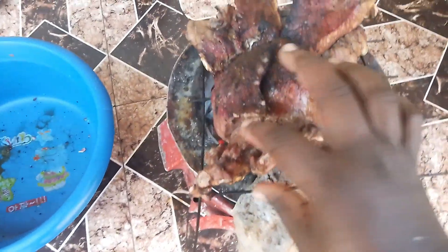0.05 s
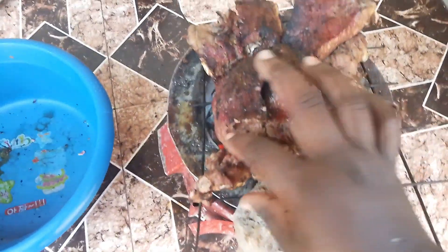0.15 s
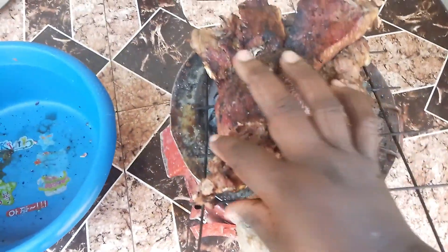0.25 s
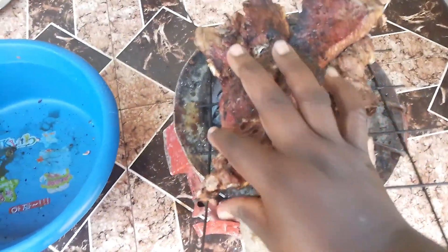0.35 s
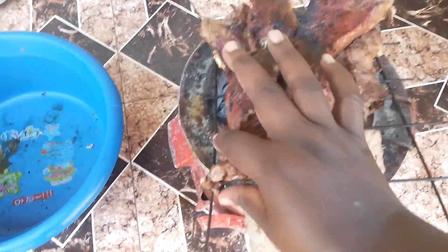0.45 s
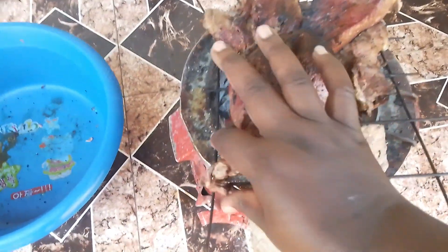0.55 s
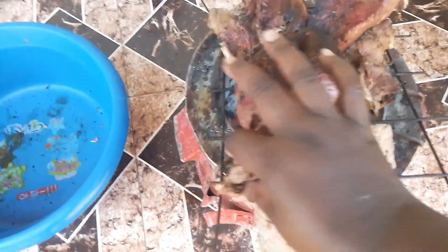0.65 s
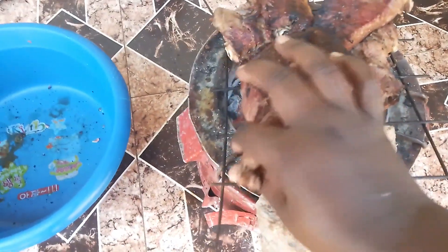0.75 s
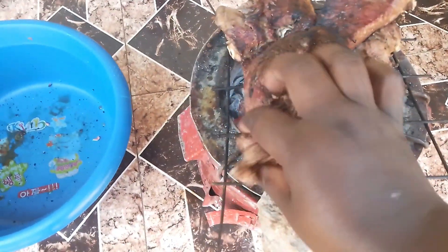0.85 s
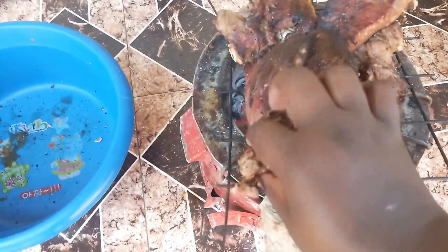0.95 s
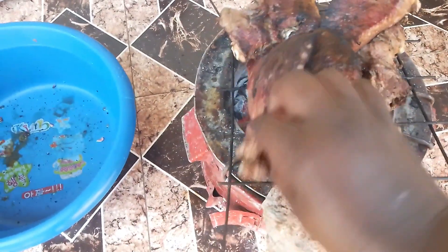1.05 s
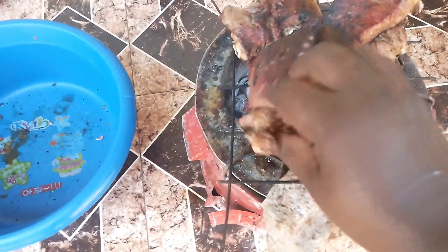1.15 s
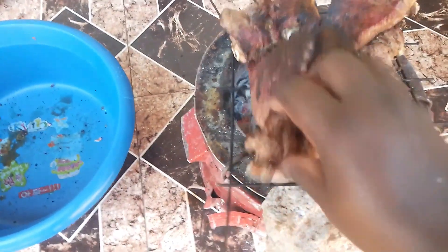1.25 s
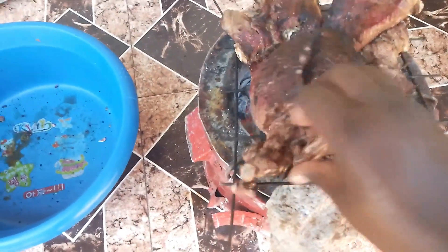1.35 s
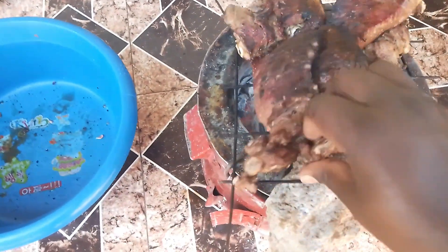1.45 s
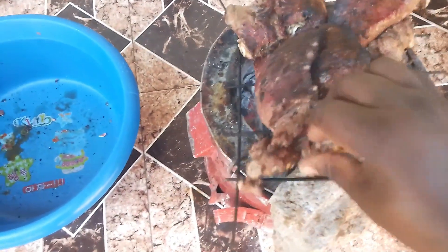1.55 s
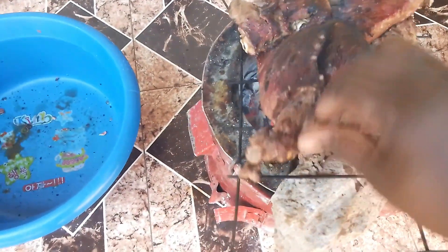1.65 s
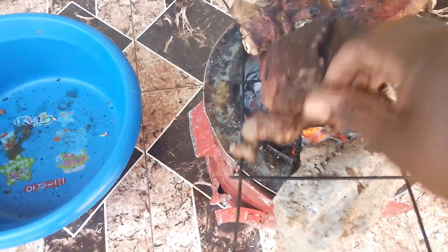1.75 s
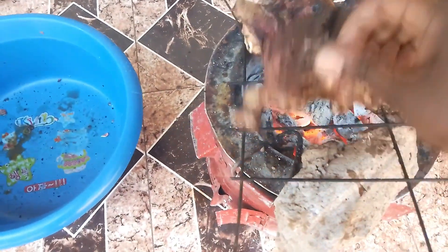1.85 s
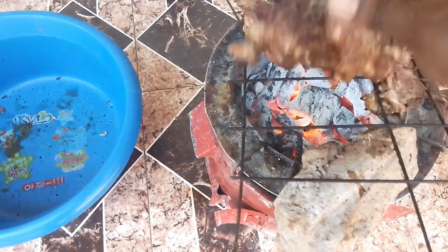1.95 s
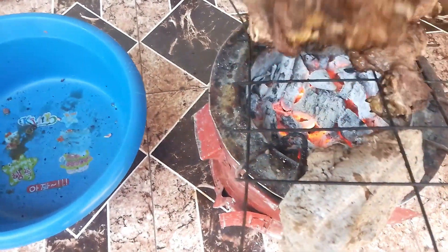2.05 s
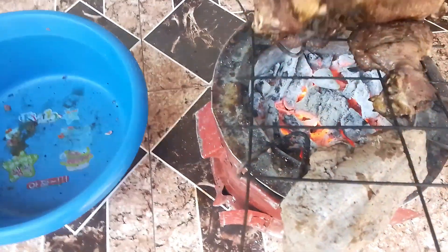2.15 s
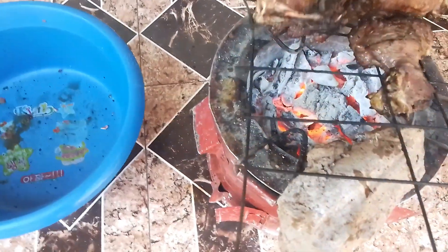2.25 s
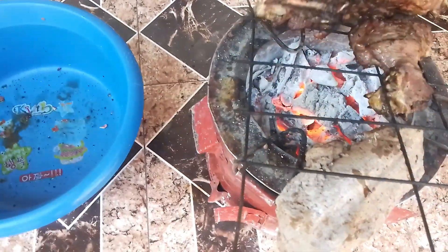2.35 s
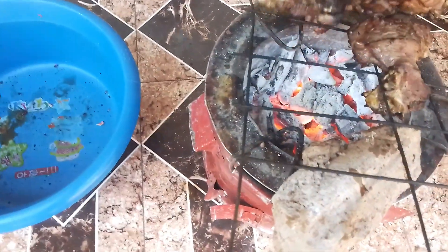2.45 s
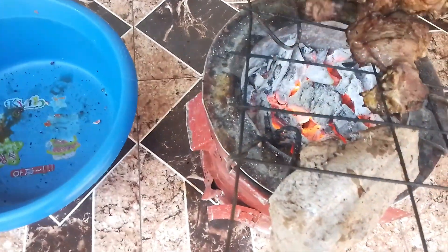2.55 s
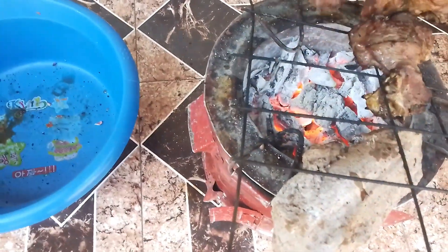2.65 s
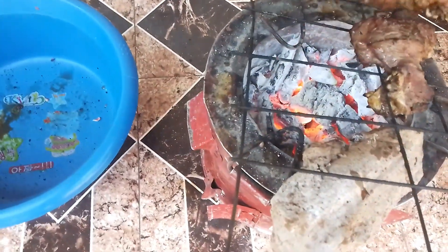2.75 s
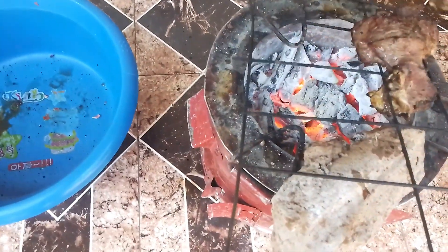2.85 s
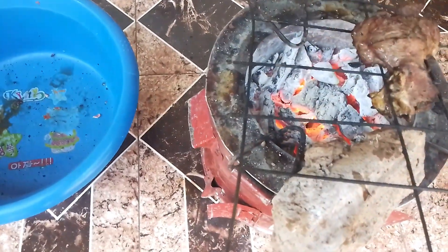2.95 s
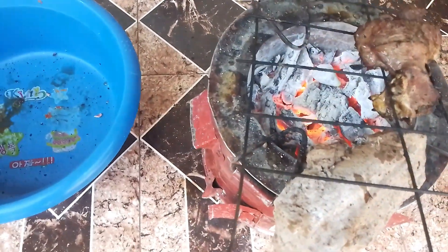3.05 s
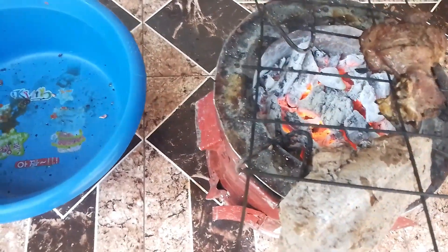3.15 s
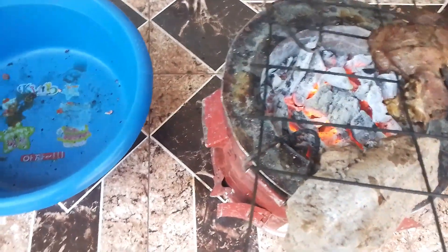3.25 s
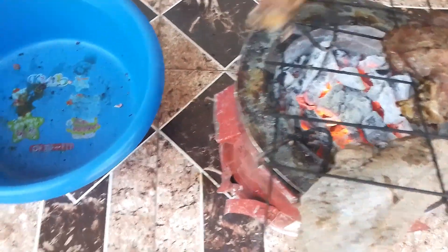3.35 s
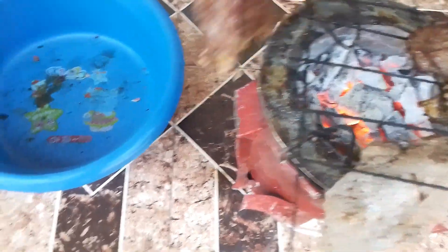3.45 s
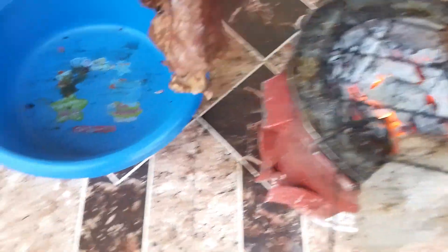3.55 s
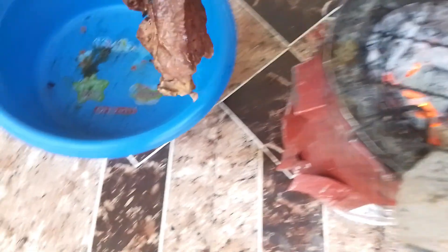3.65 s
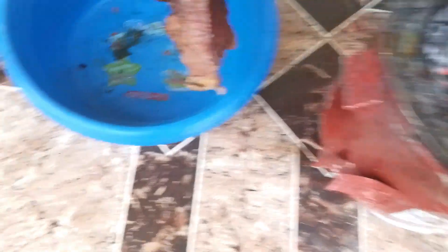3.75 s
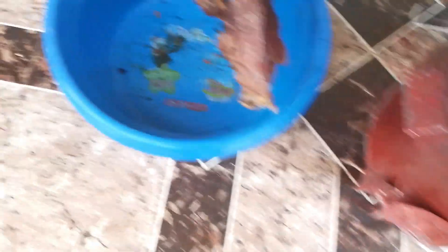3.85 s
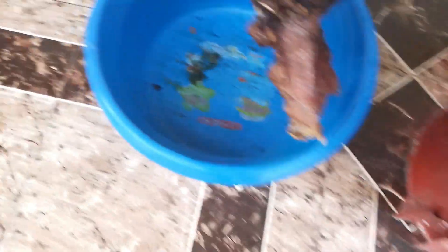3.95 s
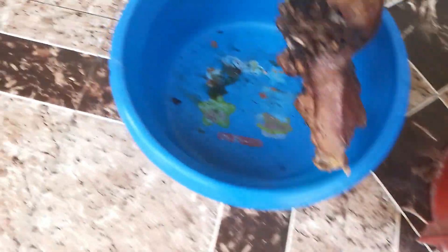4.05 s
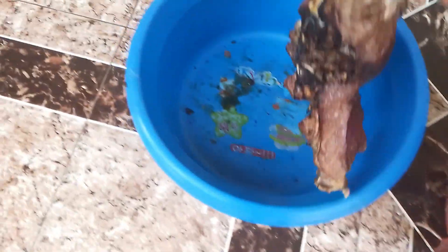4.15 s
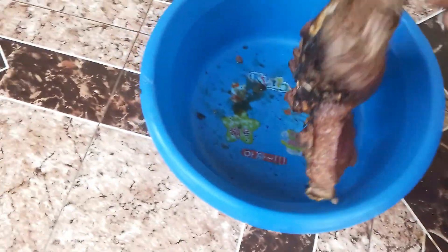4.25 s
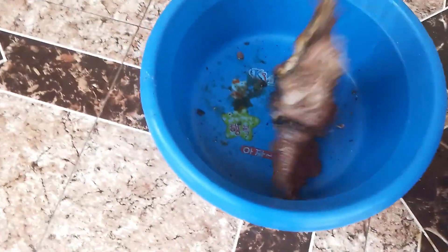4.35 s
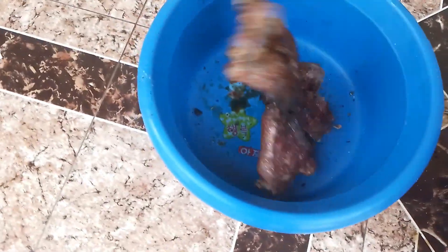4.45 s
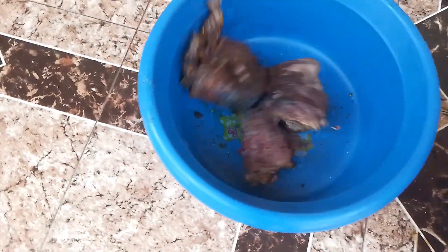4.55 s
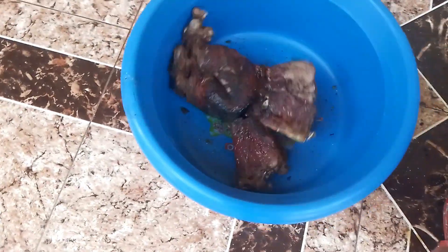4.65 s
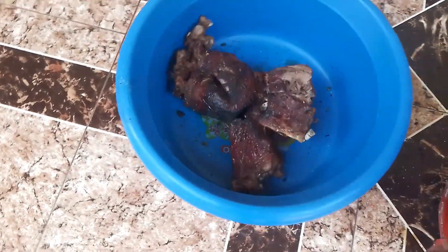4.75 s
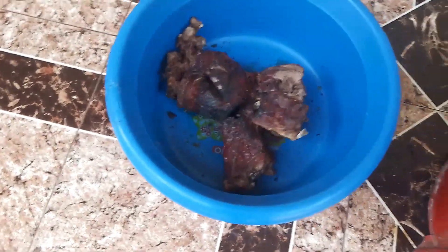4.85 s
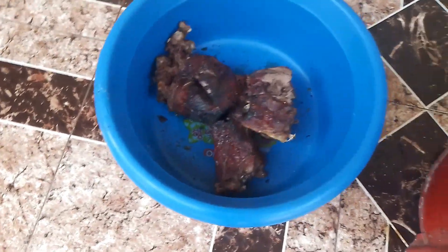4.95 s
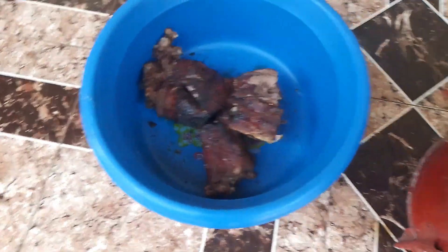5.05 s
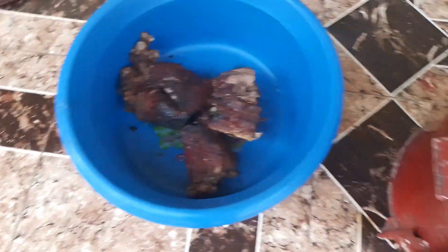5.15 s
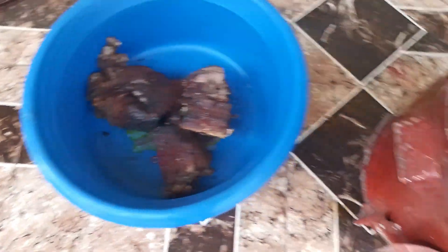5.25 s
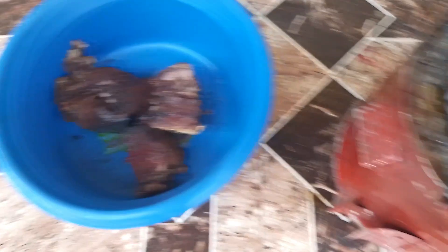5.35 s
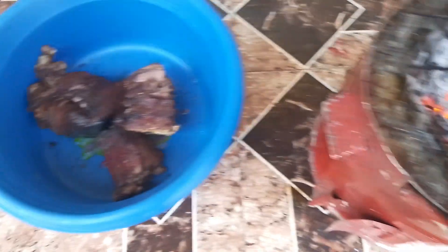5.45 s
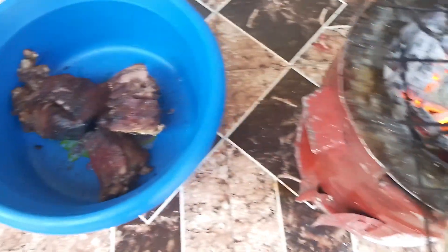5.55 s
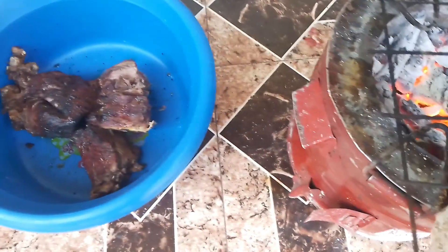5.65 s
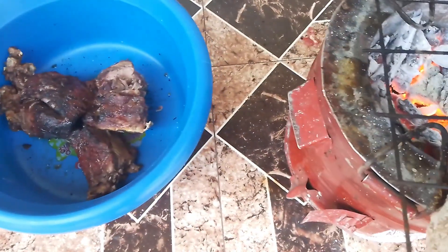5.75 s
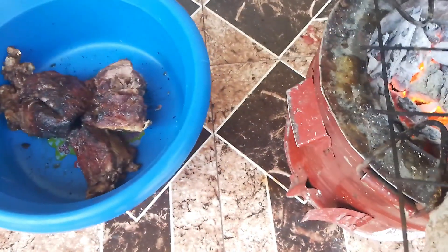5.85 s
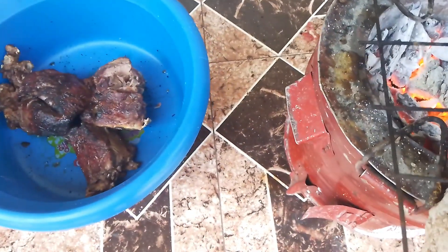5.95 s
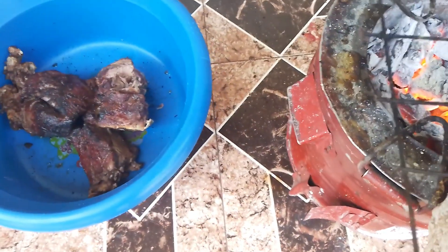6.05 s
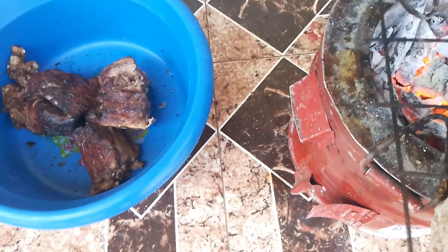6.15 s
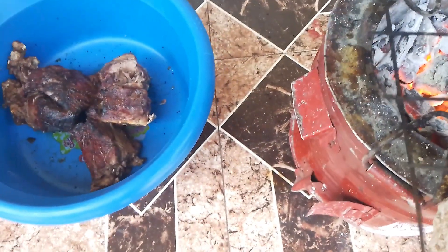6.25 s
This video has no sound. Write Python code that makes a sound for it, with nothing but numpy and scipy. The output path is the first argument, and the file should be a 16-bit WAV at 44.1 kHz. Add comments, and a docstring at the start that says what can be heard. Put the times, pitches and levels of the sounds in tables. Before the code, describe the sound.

Thin, bright frying and snapping embers, soft scrapes and rings of a wire grid, two wet plastic thumps, then a fierce shrill hiss.

```python
"""A tiled kitchen: smoked meat is pulled off a wire grill over charcoal and dropped into a plastic basin.
Fat fries as dense bubbles and steam, spits in sharp rattling cracks, and hisses when drips reach the coals.
The grill rings in restless modes under scraping crust; filtered noise makes two wet slaps and their slips,
and struck modes ring the basin. Behind lie a low flame, a faint hollow tone, room air and tiled echo."""
import sys
import numpy as np
from scipy import signal
from scipy.fft import rfft, irfft
from scipy.io import wavfile
from scipy.ndimage import uniform_filter1d

SR = 44100
rng = np.random.default_rng(int(sys.argv[2]) if len(sys.argv) > 2 else 0)


def generate_wav(signal):
    """Clip the signal to [-1, 1] and save it as 16-bit WAV at the path in sys.argv[1]."""
    frames = np.transpose(np.atleast_2d(signal))
    scaled = np.clip(frames, -1, 1) * 32767
    pcm = np.round(scaled).astype(np.int16)
    wavfile.write(sys.argv[1], SR, pcm)


N = 278271
TIME = np.arange(N) / SR
CUTOFF_HZ = 15900   # top of the whole sound

# Steady frying in the lulls between drips, in three stretches. Each row: time in seconds, level in dB
# before the frying gain.
FRYING_LEVELS = [
    [(0.0, -54), (2.0, -52.5), (2.05, -47.5)],
    [(3.0, -46.5), (3.522, -50), (4.35, -52)],
    [(5.62, -50.5), (6.12, -52)],
]
FRYING_GAIN_DB = 1
# Tone colour of the frying. Each row: frequency in Hz, relative level in dB.
FRYING_COLOUR = [(1500, -22), (2600, -27.5), (3500, -22), (5000, -15), (6200, -12.5), (7600, -5.5),
                 (9300, 2.5), (11500, -1), (14300, 0), (15800, 3)]

# Drips boiling off on the coals. Each row: start in seconds, hiss level in dB, fine spray level in dB,
# boiling time after the rise in seconds, shrillness from 0 to 1.
DRIPS = [(2.13, -47.5, -46, 0.21, 0.16), (2.265, -42, -44, .28, 0), (2.655, -42.5, -46, 0.087, 0.03),
         (4.49, -38, -35, 0.18, 0.7), (4.69, -33, -28, 0.056, 0.84), (4.809, -31, -32, 0.51, 1),
         (6.164, -44.5, -43, 0.032, 0.33), (6.2, -41, -37.5, .15, 0.13)]
# A drip flares up, sinks while it boils and dies faster once dry; the fine spray sinks faster.
DRIP_RISE_S, DRIP_SAG_DB_PER_S, SPRAY_SAG_DB_PER_S, DRY_DB_PER_S = 0.02, 13.5, 29, 72
# Tone colour of a broad hiss. Each row: frequency in Hz, relative level in dB.
BROAD_HISS_COLOUR = [(2000, -35.5), (5000, -17.5), (6400, -13), (7500, -2.5), (9400, 1), (10300, -7.5),
                     (11000, 0), (11800, -10.5), (13200, -5), (14300, -0.5), (15800, -25)]
# Tone colour of a shrill hiss. Each row: frequency in Hz, relative level in dB.
SHRILL_HISS_COLOUR = [(2500, -41.5), (5000, -30), (6800, -21.5), (7600, -9.5), (8600, -5), (9400, 1),
                      (10300, -10), (11700, -12.5), (13200, 0), (15800, -6.5)]

# Loud spits of fat and snapping embers. Each row: start in seconds, peak level of the crack in dB,
# pitch in Hz, rattle in dB against the crack, body below the treble in dB.
LOUD_SPITS = [(0.1142, -12.5, 13000, -2, -21), (0.8515, -23.5, 8900, -6, -37),
              (.8999, -25.5, 9500, -2, -28), (1.0132, -28.5, 14100, -3.5, -30),
              (1.0434, -19, 14300, 2.5, -28), (1.1348, -20.5, 9150, -3, -27),
              (1.5164, -16, 7200, -0.5, -21), (1.6396, -23.5, 8900, -0.5, -20.5),
              (1.7073, -26, 12600, 3.5, -28), (2.134, -8.5, 14000, -13, -15),
              (2.6549, -9.5, 9300, 1.5, -24), (3.453, -23.5, 14600, -6, -34), (3.4965, -27, 10250, -6, -30),
              (4.5958, -16, 10000, -16, -18), (4.715, -5, 11200, -14, -27),
              (4.7576, -10, 11740, -13.5, -18.5), (5.2899, -25, 12200, -15, -24),
              (6.254, -18.5, 10550, 4, -28), (6.298, -9, 9100, -11, -21)]
CRACK_T60_S = 0.0026
# Small spits come by chance, more often and louder the harder the fat sizzles.
SMALL_SPITS_PER_S, BUSY_SIZZLE_DB = 11, -32.5   # the rate reached at this sizzle level
SPIT_OVER_SIZZLE_DB, SMALL_SPIT_HZ, SMALL_SPIT_LOWEST_HZ = 12, 9820, 7800
SMALL_SPIT_RATTLE_DB, SMALL_SPIT_BODY_DB = -10, -40

# Nudges of the grill. Each row: start in seconds, ring level in dB, scrape level in dB,
# T60 of the rubbing in seconds.
GRILL_NUDGES = [(.31, -63.5, -67, 0.42), (.586, -68, -53.5, 0.14), (0.654, -67, -62.5, 1),
                (0.811, -70.5, -58.5, 0.43), (1.159, -60.5, -48.5, 0.13), (1.365, -59, -47.5, 0.22),
                (1.535, -50, -52.5, 0.22), (1.721, -58, -62, 0.56), (2.275, -41.5, -34.5, 0.14),
                (2.654, -66, -62, 0.47), (3.026, -37, -47.5, 0.23), (3.095, -50, -58, 0.081),
                (3.3, -46.5, -46.5, 0.15), (3.452, -42.5, -43.5, 0.092)]
# Ringing modes of the wire grid. Each row: frequency in Hz, relative level in dB, T60 in seconds.
GRILL_MODES = [(317.8, -20, 0.47), (388.8, 2.5, 0.24), (427, -21, 0.12), (479, -13, 0.39), (758, -28, 0.17),
               (1080, -26.5, 0.29)]
GRILL_WOBBLE, GRILL_WOBBLE_PER_S = 0.028, 70   # the shifting meat detunes the grid by this share
GRILL_GIVE_S = 0.022   # the ring swells in over this time constant
# Tone colour of crust on wire. Each row: frequency in Hz, relative level in dB.
SCRAPE_COLOUR = [(250, -7), (400, -13), (600, -3.5), (800, 6.5), (1150, 0.5), (1600, -11), (2700, -6.5),
                 (3800, -2), (5500, -1.5), (8000, 10.5), (15000, 2.5)]
# Squeaks of crust dragging over the wire. Each row: start in seconds, level in dB, centre in Hz.
CRUST_SQUEAKS = [(1.358, -54, 5540), (1.376, -55, 5400)]

# Wet slaps of the meat. Each row: start in seconds, level in dB before the bass cut, T60 in seconds,
# spray (treble against the body) in dB, bass cut in Hz: light contacts have no bass.
WET_SLAPS = [(4.432, -37, 0.23, 13, 990), (4.453, -25.5, 0.033, -8, 498), (4.459, -14, 0.047, -1, 430),
             (4.4718, -9, 0.039, -5.5, 654), (4.4849, -19, 0.15, -0.5, 243), (4.67, -18.5, 0.05, -4, 1210),
             (4.6818, -15.5, 0.059, 0.5, 264), (4.6946, -20.5, 0.17, 3, 960), (4.7664, -29, 0.044, 1, 600),
             (4.7893, -30.5, 0.02, -11, 900)]
# Tone colour of wet crust on plastic. Each row: frequency in Hz, relative level in dB.
SLAP_COLOUR = [(150, -24), (300, 0), (500, 4), (800, 1.5), (1300, -3.5), (2200, -6.5), (2800, -9),
               (3400, -3.5), (4700, -0.5), (6300, -5), (8700, 6.5), (10500, 1), (12000, -4), (15800, -8)]
# The weight landing on the basin floor. Each row: start in seconds, level in dB before softening,
# contact softness as a treble cut in Hz.
BASIN_THUMPS = [(4.463, -20, 2400), (4.4758, -17, 3012), (4.6824, -14.5, 535)]
# Ringing modes of the plastic basin. Each row: frequency in Hz, relative level in dB, T60 in seconds.
BASIN_MODES = [(284.5, -22.5, 0.051), (424, -9.5, 0.06), (470.5, -9.5, 0.09), (505, -12.5, 0.069),
               (702, -9.5, 0.018), (800, -19, 0.16), (1060, -5.5, 0.036), (1266, -3.5, 0.047),
               (1524, -0.5, 0.025), (1595, -4.5, .046), (1850, -4.5, 0.054), (2270, -9.5, .035)]
# Tone colour of the tiled floor under the basin. Each row: frequency in Hz, relative level in dB.
FLOOR_THUD_COLOUR = [(25, 2), (70, -11), (200, -0.5), (350, -24.5)]
# The meat slides out of the hand, louder and louder until it lets go.
SLIDE_END_S, SLIDE_DB, SLIDE_SWELL_DB_PER_S, SLIDE_STOP_DB_PER_S = 4.45, -40, 301.5, 429
# Tone colour of the slide. Each row: frequency in Hz, relative level in dB.
SLIDE_COLOUR = [(750, -30), (1050, -6.5), (1550, -6.5), (1800, -3), (2050, -1), (2300, -12), (2600, -15.5),
                (3500, -13), (8000, -24.5)]
# Ragged scraping of the crust as it settles after a landing. Each row: start in seconds, level in dB
# before the bass cut.
SETTLES = [(4.49, -34), (4.713, -36.5)]
SETTLE_HOLD_S, SETTLE_FADE_DB_PER_S, SETTLE_RAGGED_DB = 0.055, 149, 2.5

# Puffs of flame as the fat catches. Each row: start in seconds, level in dB, hold after the rise in seconds.
FLAME_PUFFS = [(5.931, -66, .06), (6.193, -56.5, .015), (6.249, -50.5, .05)]
PUFF_RISE_S, PUFF_FADE_DB_PER_S = 0.034, 112
FLAME_IDLE_DB, FLAME_START_S = -82.5, 4.3
# Tone colour of the flame. Each row: frequency in Hz, relative level in dB.
FLAME_COLOUR = [(30, -30.5), (90, -3.5), (150, -14.5), (260, -0.5), (360, 4.5), (480, -10.5), (700, -18),
                (1500, -25)]
# A faint hollow tone swells, sags in pitch as it fades, then lingers and creeps up again.
TONE_START_S, TONE_RISE_S, TONE_HOLD_S, TONE_LINGER_S = 3.53, 0.077, 0.02, 1
TONE_DB, TONE_LINGER_DB, TONE_FADE_DB_PER_S, TONE_FLUTTER_DB = -55, -74.5, 130, 4
TONE_HZ, TONE_SAG_HZ, TONE_SAG_S, TONE_CREEP_HZ_PER_S = 383, 84, 0.19, 63
# Tone colour of the room air. Each row: frequency in Hz, relative level in dB.
ROOM_COLOUR = [(25, -23), (60, -7.5), (95, -1.5), (150, -19.5), (230, -1.5), (380, 0.5), (550, 0.5),
               (900, -4), (1250, -7), (1800, -21.5), (3000, -10.5)]
ROOM_DB = -76.5


def from_db(db):
    """Decibels to gain."""
    return 10 ** (np.asarray(db) / 20)


def rms_one(x):
    """Scale to unit power."""
    return x / np.sqrt(np.mean(x ** 2) + 1e-20)


def colour(x, points):
    """Filter x by a curve that falls 20 dB per octave beyond its end points; rms 1."""
    hz, db = np.transpose(points)
    octave = np.log2(np.arange(len(x) // 2 + 1) * SR / len(x) + 1)
    known = np.log2(hz)
    beyond = np.abs(octave - np.clip(octave, known[0], known[-1]))
    gain = from_db(np.interp(octave, known, db) - 20 * beyond)
    return rms_one(irfft(rfft(x) * gain, len(x)))


def cut(x, hz, kind, order=2):
    """Butterworth low- or high-pass."""
    return signal.sosfilt(signal.butter(order, hz, kind, fs=SR, output="sos"), x)


def drift(rate, size=N):
    """Random wandering with spread 1, through new values at the given rate per second."""
    knots = rng.standard_normal(4000)
    return rms_one(np.interp(TIME[:size] * rate, np.arange(len(knots)), knots))


def dying(t60, size):
    """Exponential decay by 60 dB in t60 seconds."""
    return from_db(-60 * TIME[:size] / t60)


def swell(s, rise_s, hold_s, fade_db_per_s, sag_db_per_s=0):
    """Gain that rises from time s, holds or sags, then fades."""
    age = np.maximum(TIME - s, 0)
    fading = np.maximum(age - rise_s - hold_s, 0)
    return np.minimum(age / rise_s, 1) * from_db(-sag_db_per_s * age - fade_db_per_s * fading)


def add(out, s, sound):
    """Mix a sound in at time s."""
    at = int(s * SR)
    out[at:at + len(sound)] += sound[:max(N - at, 0)]


def struck(modes, scatter_db, wobble=0, size=26000):
    """One blow on a body: each mode rings at a strength of its own, and wavers under a shifting load."""
    out = np.zeros(size)
    for k, (hz, db, t60) in enumerate(modes):
        bend = 1 + wobble * drift(GRILL_WOBBLE_PER_S, size=size)
        tone = np.sin(2 * np.pi * hz * np.cumsum(bend) / SR)
        strength = (-1) ** k * from_db(db + scatter_db * rng.normal())
        out += strength * dying(t60, size) * tone
    return out


def fizz(per_s, spread_db, steam_db):
    """Tiny bursting bubbles of uneven size over smooth steam."""
    sizes = from_db(spread_db * np.minimum(rng.exponential(1, N), 5)) * rng.choice([-1, 1], N)
    bubbles = rms_one(sizes * (rng.random(N) < per_s / SR))
    return rms_one(bubbles + from_db(steam_db) * rng.standard_normal(N))


def frying(tick_db=-13):
    """Fat fries quietly on the hot wire: a dense bed of bubbles, with now and then a larger one."""
    bed = fizz(per_s=4500, spread_db=3.5, steam_db=0.5)
    ticks = fizz(per_s=68, spread_db=3.0, steam_db=-31.5)
    s, db = np.transpose(np.vstack(FRYING_LEVELS))
    gain = from_db(FRYING_GAIN_DB + np.interp(TIME, s, db))
    flicker = from_db(1.2 * drift(28))
    return gain * colour(bed + from_db(tick_db) * ticks, FRYING_COLOUR) * flicker


def drips():
    """Every drip flares, boils and dries by the same rule; overlapping drips add in power."""
    power = np.zeros((2, 2, N))   # broad or shrill, hiss or spray
    for s, hiss_db, spray_db, boil_s, shrill in DRIPS:
        hiss = from_db(hiss_db) * swell(s, DRIP_RISE_S, boil_s, DRY_DB_PER_S, DRIP_SAG_DB_PER_S)
        spray = from_db(spray_db) * swell(s, DRIP_RISE_S, boil_s, DRY_DB_PER_S, SPRAY_SAG_DB_PER_S)
        power += np.multiply.outer([1 - shrill, shrill], [hiss ** 2, spray ** 2])
    sounds = [boiling(BROAD_HISS_COLOUR), boiling(SHRILL_HISS_COLOUR)]
    return (np.sqrt(power) * sounds).sum(axis=(0, 1))


def boiling(spectrum, whistle_db=-2, width_hz=70, count=22):
    """Hiss and fine spray: dense bubbles, and steam whistling through pores that open and close."""
    bubbles = fizz(per_s=13000, spread_db=7.0, steam_db=-1)
    radius = np.exp(-np.pi * width_hz / SR)   # a narrow resonance for each pore
    pores = np.zeros(N)
    for hz in np.geomspace(7500, 15200, count) * rng.uniform(0.985, 1.015, count):
        poles = [1, -2 * radius * np.cos(2 * np.pi * hz / SR), radius ** 2]
        whistle = signal.lfilter([1, 0, -1], poles, rng.standard_normal(N))
        pores += whistle * from_db(5.0 * np.tanh(drift(5.6)))
    sound = colour(bubbles + from_db(whistle_db) * rms_one(pores), spectrum)
    sound = sound * from_db(0.9 * drift(75))
    hiss = rms_one(cut(sound, 11200, "low", order=8))
    spray = rms_one(cut(sound, 11200, "high", order=8))
    return hiss, spray


def spits(rows, ring_db=-1, bursts_per_s=2200, rattle_t60=0.056, bright_hz=7000, size=2048):
    """Each spit is a sharp crack with a brief pitch, then a rattle of smaller bursts."""
    out = np.zeros(N)
    for s, db, hz, rattle_db, body_db in rows:
        pitch = np.sin(2 * np.pi * hz * TIME[:size])
        crack = (rng.standard_normal(size) + from_db(ring_db) * pitch) * dying(CRACK_T60_S, size)
        crack = cut(crack, CUTOFF_HZ, "low", order=4)
        # so small a burst radiates mostly treble
        body = from_db(body_db) * cut(crack, 600, "high")
        crack = cut(crack, bright_hz, "high", order=4) + body
        rattle = rng.standard_normal(size) * (rng.random(size) < bursts_per_s / SR)
        rattle = rattle * dying(rattle_t60, size)
        bursts = from_db(rattle_db) * rattle / (np.linalg.norm(rattle) + 1e-9)
        bursts[0] = 1   # the crack itself
        add(out, s, from_db(db) * np.convolve(crack / np.abs(crack).max(), bursts))
    return out


def small_spits(sizzle, scatter_db=2.0, pitch_spread=0.04):
    """Chance spits whose rate and strength follow the sizzle; rows as in LOUD_SPITS."""
    gain = np.sqrt(uniform_filter1d(sizzle ** 2, size=4096) + 1e-12)
    chance = SMALL_SPITS_PER_S * gain / from_db(BUSY_SIZZLE_DB) / SR
    rows = []
    for i in np.flatnonzero(rng.random(N) < chance):
        db = 20 * np.log10(gain[i]) + SPIT_OVER_SIZZLE_DB + scatter_db * rng.normal()
        hz = SMALL_SPIT_HZ * np.exp(pitch_spread * rng.normal())
        rows.append((i / SR, db, hz, SMALL_SPIT_RATTLE_DB, SMALL_SPIT_BODY_DB))
    return rows


def grill(unrest_db=2.5, size=26000):
    """Crust scrapes and squeaks over the wire, and the grid swells into a soft, restless ring."""
    out = np.zeros(N)
    for s, ring_db, scrape_db, t60 in GRILL_NUDGES:
        ring = struck(GRILL_MODES, scatter_db=1.5, wobble=GRILL_WOBBLE, size=size)
        ring = ring * (1 - np.exp(-TIME[:size] / GRILL_GIVE_S))
        add(out, s, from_db(ring_db + unrest_db * drift(47.3, size=size)) * ring)
        crumbs = rng.standard_normal(size) * from_db(3.6 * rng.standard_normal(size))
        add(out, s, from_db(scrape_db) * colour(crumbs, SCRAPE_COLOUR) * dying(t60, size))
    for s, db, hz in CRUST_SQUEAKS:
        squeak = colour(rng.standard_normal(size), [(hz - 600, -20), (hz, 0), (hz + 600, -20)])
        add(out, s, from_db(db) * squeak * dying(0.13, size))
    return out


def basin(spray_hz=6500, bounce_s=0.00396, bounce=0.15, thud_db=-43, size=16384):
    """Greasy crust slaps the plastic, then the weight behind it thumps the basin and the floor below."""
    out = slide() + settling()
    thuds = np.zeros(N)
    for s, db, t60, spray_db, lowest_hz in WET_SLAPS:
        wet = colour(rng.standard_normal(size), SLAP_COLOUR)
        spray = from_db(spray_db) * cut(wet, spray_hz, "high", order=3)
        wet = cut(wet, spray_hz, "low", order=3) + spray
        add(out, s, from_db(db) * cut(rms_one(wet) * dying(t60, size), lowest_hz, "high"))
    for s, db, soft_hz in BASIN_THUMPS:
        add(out, s, from_db(db) * cut(struck(BASIN_MODES, scatter_db=1.3), soft_hz, "low"))
        thud = colour(rng.standard_normal(size), FLOOR_THUD_COLOUR) * dying(0.32, size)
        add(thuds, s, from_db(db + thud_db) * thud)
    # sound bounces to and fro between the hard surfaces close by, which hollows it
    round_trip = np.exp(-2j * np.pi * np.arange(N // 2 + 1) * SR / N * bounce_s)
    hollow = irfft(rfft(out) / (1 - bounce * round_trip), N)
    return cut(hollow, 240, "high", order=4) + thuds


def slide():
    """The greasy crust slips through the fingers as grainy friction that swells, then stops."""
    swelling = SLIDE_SWELL_DB_PER_S * (TIME - SLIDE_END_S)
    stopping = SLIDE_STOP_DB_PER_S * (SLIDE_END_S - TIME)
    gain = from_db(SLIDE_DB + np.minimum(swelling, stopping))
    friction = fizz(per_s=1300, spread_db=2, steam_db=1.5)
    return gain * colour(friction, SLIDE_COLOUR)


def settling(rise_s=0.0095, lowest_hz=450):
    """The pieces slump on the plastic in many small slips."""
    gain = sum(from_db(db) * swell(s, rise_s, SETTLE_HOLD_S, SETTLE_FADE_DB_PER_S) for s, db in SETTLES)
    slips = colour(fizz(per_s=700, spread_db=2.5, steam_db=-5), SLAP_COLOUR)
    slips = slips * from_db(SETTLE_RAGGED_DB * drift(90))
    return gain * cut(slips, lowest_hz, "high")


def flame():
    """A low rumble of flame over the coals, as shaped noise, with a puff each time fat catches."""
    gain = from_db(FLAME_IDLE_DB) * swell(FLAME_START_S, PUFF_RISE_S, N / SR, PUFF_FADE_DB_PER_S)
    for s, db, hold_s in FLAME_PUFFS:
        gain += from_db(db) * swell(s, PUFF_RISE_S, hold_s, PUFF_FADE_DB_PER_S)
    return gain * colour(rng.standard_normal(N), FLAME_COLOUR)


def hollow_tone(waver=0.037):
    """A faint, wavering sine that sags in pitch, lingers and creeps up."""
    age = np.maximum(TIME - TONE_START_S, 0)
    sag = TONE_SAG_HZ * (1 - np.exp(-(age / TONE_SAG_S) ** 2))
    pitch = (TONE_HZ - sag + TONE_CREEP_HZ_PER_S * age) * (1 + waver * drift(59))
    gain = from_db(TONE_DB) * swell(TONE_START_S, TONE_RISE_S, TONE_HOLD_S, TONE_FADE_DB_PER_S)
    gain += from_db(TONE_LINGER_DB) * swell(TONE_START_S, TONE_RISE_S, TONE_LINGER_S, TONE_FADE_DB_PER_S)
    tone = np.sin(2 * np.pi * np.cumsum(pitch) / SR)
    return gain * rms_one(tone * from_db(TONE_FLUTTER_DB * drift(22)))


def room_air():
    """Low background noise of the room, gently unsteady."""
    return from_db(ROOM_DB) * colour(rng.standard_normal(N), ROOM_COLOUR) * from_db(2.7 * drift(7))


def kitchen_echo(x, low_t60=0.64, high_t60=0.26, split_hz=4000, size=32768):
    """Diffuse echo of the tiled room; the treble dies first."""
    noise = rng.standard_normal(size) * (TIME[:size] > 0.003)   # silent until the first reflection
    low = cut(noise, split_hz, "low") * dying(low_t60, size)
    high = cut(noise, split_hz, "high") * dying(high_t60, size)
    echo = low + high
    return signal.fftconvolve(x, echo / np.linalg.norm(echo))[:N]


def scene():
    """Sizzle, grill, basin and room together; small things radiate little bass."""
    sizzle = frying() + drips()
    snaps = spits(LOUD_SPITS)
    snaps += cut(spits(small_spits(sizzle)), SMALL_SPIT_LOWEST_HZ, "high", order=6)
    rings = cut(grill(), 200, "high")
    drop = basin()
    background = flame() + hollow_tone() + room_air()
    to_room = from_db(-8) * cut(snaps, 3500, "high") + from_db(-7.5) * rings + from_db(-13.5) * drop
    return (snaps + rings + drop + sizzle + background + kitchen_echo(to_room))[None]


def record(dry):
    """Cut the top steeply with an elliptic low-pass."""
    return signal.sosfilt(signal.ellip(10, 0.2, 70, CUTOFF_HZ, fs=SR, output="sos"), dry)


dry = scene()
out = record(dry)
generate_wav(out)
```